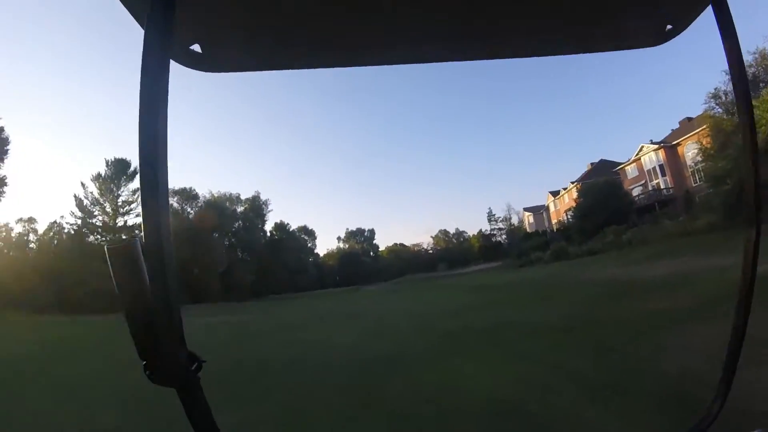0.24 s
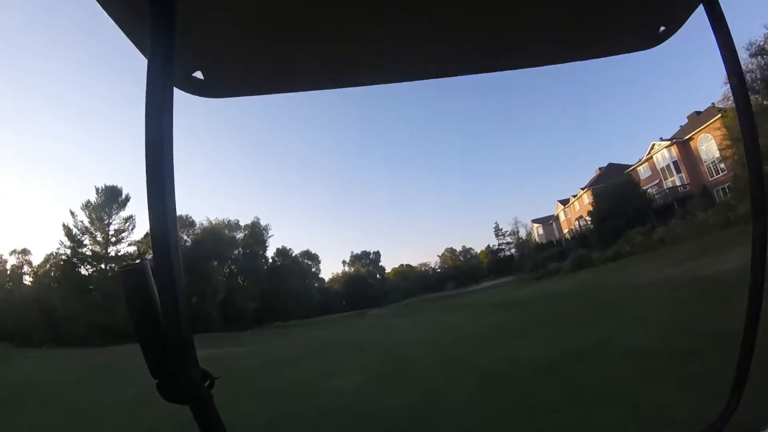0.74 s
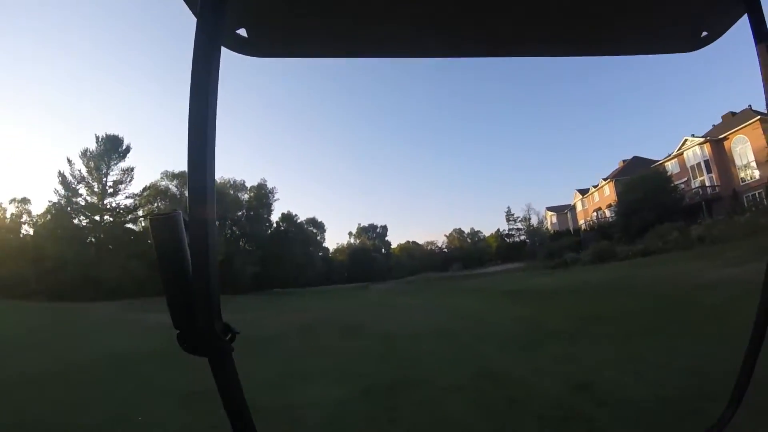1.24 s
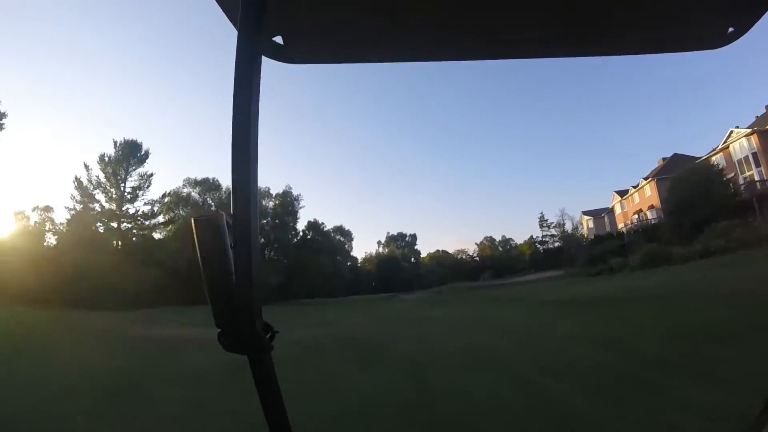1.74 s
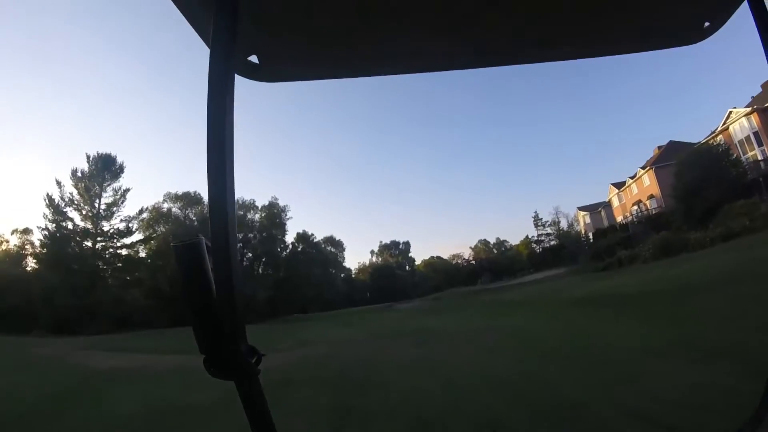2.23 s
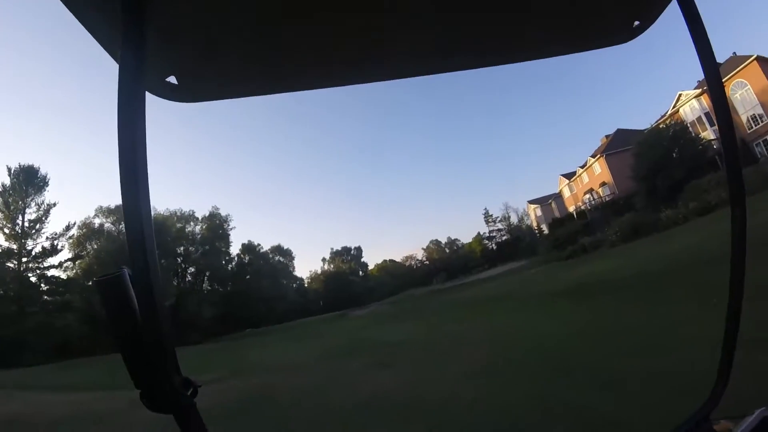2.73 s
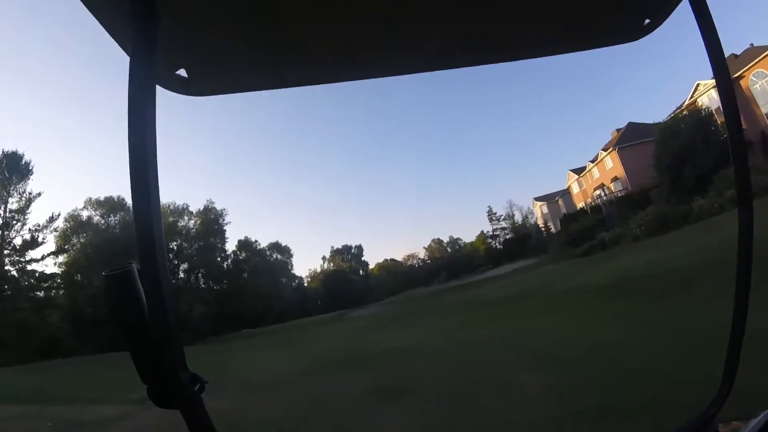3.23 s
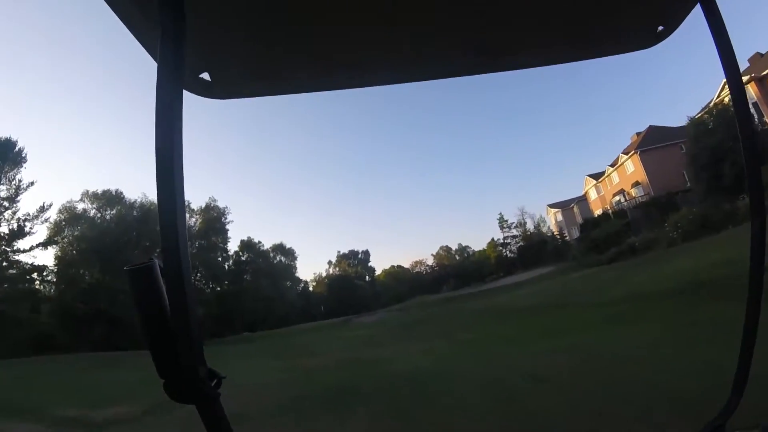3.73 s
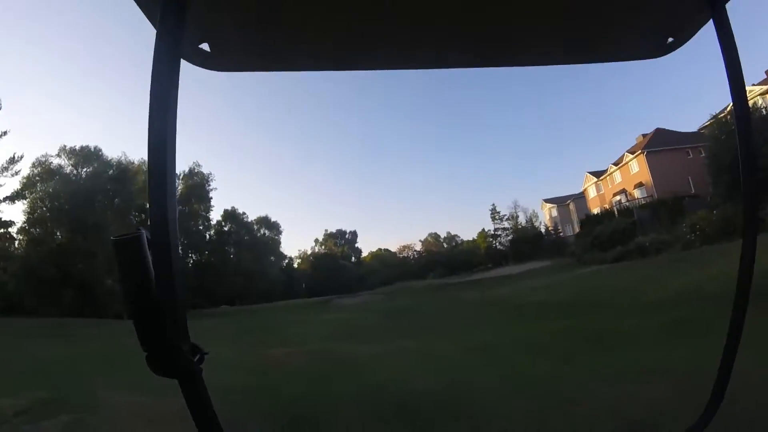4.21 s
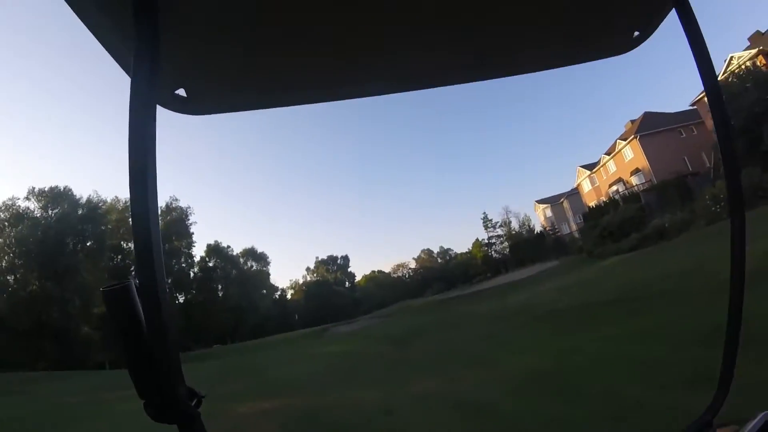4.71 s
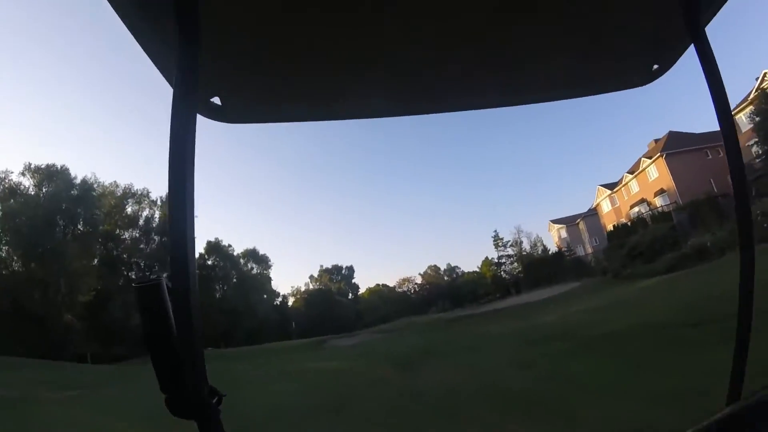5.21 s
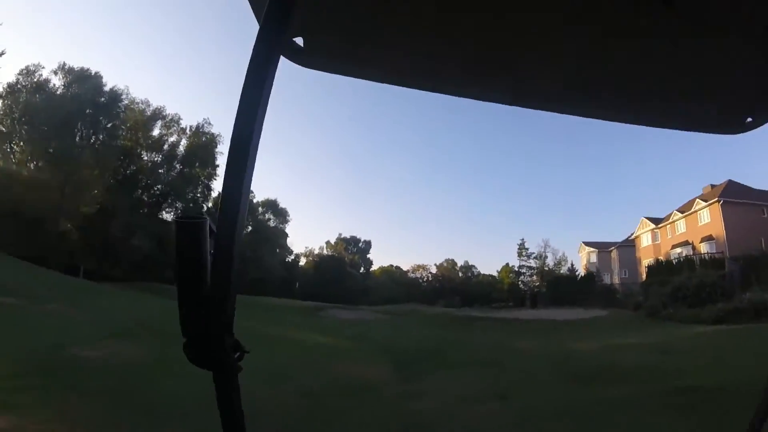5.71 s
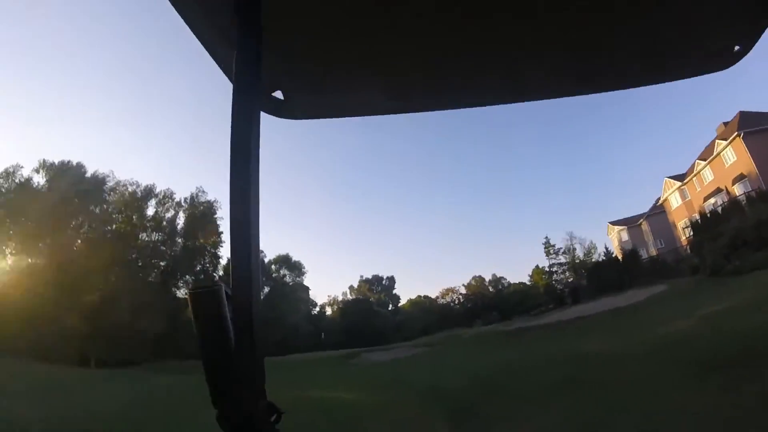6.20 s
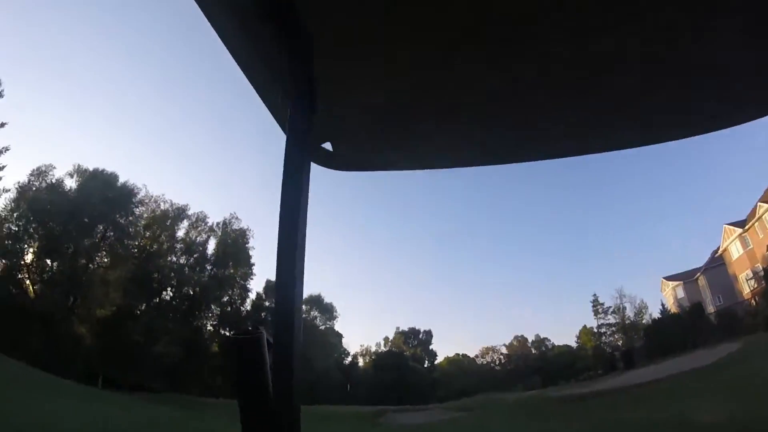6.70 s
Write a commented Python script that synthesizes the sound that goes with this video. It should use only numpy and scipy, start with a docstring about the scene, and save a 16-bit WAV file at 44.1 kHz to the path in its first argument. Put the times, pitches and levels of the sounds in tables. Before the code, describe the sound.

A small cart's one-cylinder engine drones steadily over grass with buzzing panels, while clunky knocks on the microphone mount come in clusters, hardest near the end.

```python
"""A small cart with a one-cylinder four-stroke engine drives over grass at governed speed.
Throughout, engine orders drone, firings buzz in the panels, axle gears whine and the ground rumbles.
Knocks on the microphone's mount crowd the first second, return before 3 s and again near 5.8 s;
the hardest, with dry cracks, comes at 6.2 s, and soft jolts follow from 6.5 s.
The recorder looks ahead, ducks before each loud knock and recovers slowly."""
import sys
import numpy as np
from scipy import signal
from scipy.io import wavfile
from scipy.ndimage import uniform_filter1d, minimum_filter1d

SR = 44100
rng = np.random.default_rng(int(sys.argv[2]) if len(sys.argv) > 2 else 0)


def linear_from_db(decibels):
    """Turn decibels (scalar or array-like) into linear amplitude factors; 0 gives 1."""
    return 10 ** (np.asarray(decibels, float) / 20)


def file_out(sig):
    """Save sig as 16-bit WAV at sys.argv[1]."""
    # one column per channel
    cols = np.atleast_2d(sig).T
    # limit, then scale
    lim = np.clip(cols, -1, 1)
    pcm = np.round(lim * 32767).astype(np.int16)
    wavfile.write(sys.argv[1], SR, pcm)


N = 306495   # samples

PIPE_LAG_RAD = 18.38   # the silencer holds the lowest orders back; divided by the order


def rms_one(x):
    """Normalisation: scales a signal to an rms of 1."""
    return x / np.sqrt(np.mean(x ** 2) + 1e-20)


def in_time(rows):
    """Linear interpolation: the columns of a curve, whose first is seconds, at every sample."""
    s, *columns = np.transpose(rows)
    return [np.interp(np.arange(N) / SR, s, column) for column in columns]


def drift(rate_hz):
    """Low-passed noise: slow random motion of rms 1, from two equal poles at rate_hz."""
    r = np.exp(-80 * np.pi * rate_hz / SR)   # one step every 40 samples
    slow = signal.lfilter([1], [1, -2 * r, r * r], rng.standard_normal(N // 40 + 2002))
    slow = slow[2000:]   # the filter has settled
    return np.interp(np.arange(N) / 40, np.arange(len(slow)), rms_one(slow))


def resonance(x, hz, width_hz):
    """Driven resonance: a two-pole band-pass with a gain of about 1 at its peak."""
    r = np.exp(-np.pi * width_hz / SR)
    zeros = np.array([1, 0, -1]) * (1 - r * r) / 2
    poles = [1, -2 * r * np.cos(2 * np.pi * hz / SR), r * r]
    return signal.lfilter(zeros, poles, x)


def ring(push, hz, t60):
    """Impulse response of a damped mode: a push of area 1 starts a decaying sine of height 1."""
    r = linear_from_db(-60 / (t60 * SR))
    w = 2 * np.pi * hz / SR
    return signal.lfilter([0, np.sin(w)], [1, -2 * r * np.cos(w), r * r], push + 1e-18)


def throb(cycles, depth_db, at):
    """Amplitude modulation: a gain that peaks once a cycle, at the given part of it."""
    return linear_from_db(depth_db * np.cos(2 * np.pi * (cycles - at)))


def thin_tone(cycles, db):
    """Narrow-band tone: a sine that wavers in level and a little in phase."""
    level = np.sqrt(2) * linear_from_db(db + 1.5 * drift(1.5))
    return level * np.sin(2 * np.pi * cycles + .5 * drift(4.0))


def pushes(s, db, ms, area=False):
    """Contact force: short smooth pushes that lean early, scaled by their height or by their area."""
    out = np.zeros(N)
    for start, level_db, length_ms in np.broadcast(s, db, ms):
        u = np.arange(0, 1, 1000 / (max(length_ms, .5) * SR))
        push = -linear_from_db(level_db) * np.sin(np.pi * u) ** 2 * (1.3 - u)
        first = round(start * SR)
        out[first:first + len(u)] += push * (2 / len(u) if area else 1)
    return out


# Engine orders of the drone. Each row: multiple of the firing rate, relative level in dB.
DRONE_ORDERS = [(1, -30), (3, -12), (4, -17), (5, -13), (6, -20.5), (7, -12), (8, -10.5), (9, -19),
                (10, -17), (11, -26), (12, -26), (13, -28)]
OPPOSED_ORDER = 4   # this order swings the other way


def drone(cycles, waver_db, slip_rad):
    """Harmonic series: low engine orders as sines whose level and phase waver a little."""
    out = 0
    for order, db in DRONE_ORDERS:
        sign = -1 if order == OPPOSED_ORDER else 1
        level = sign * linear_from_db(db + waver_db * drift(8.6))
        phase = 2 * np.pi * order * cycles - PIPE_LAG_RAD / order + slip_rad * drift(6.7)
        out = out + level * np.cos(phase)
    return rms_one(out)


# Body panels and exhaust rung by each firing.
# Each row: resonance in Hz, width in Hz, relative level in dB.
PANELS = [(386.4, 9.9, 4.5), (519.5, 20, 2), (631.7, 15, 0.5), (805, 27, 0.5), (861, 35, 4), (990, 33, -25),
          (1440, 4.9, -2.5), (1732, 6.7, 0), (2124, 25, -5.5), (2310, 52, -12.5), (2467, 26, -6.5),
          (2530, 28, -6), (2990, 18, -5), (1283, 11, -3.5), (1686, 6.6, -12), (4000, 150, -17.5)]


def firings(cycles, spread_db, blow_db):
    """Source and resonator: an uneven pulse per firing plus throbbing exhaust noise rings the panels."""
    fired = np.diff(np.floor(cycles), prepend=0) > 0
    pulses = rms_one(fired * linear_from_db(spread_db * rng.standard_normal(N)))
    puff = linear_from_db(blow_db) * throb(cycles, 3.0, 0.0) * rng.standard_normal(N)
    out = 0
    for k, (hz, width_hz, db) in enumerate(PANELS):
        level = (-1) ** k * linear_from_db(db + 1.4 * drift(3.2))   # neighbours in opposite sign
        out = out + level * resonance(pulses + puff, hz, width_hz)
    return rms_one(out)


# Spectrum of fan, belt and tyres. Each row: frequency in Hz, relative density in dB per Hz.
RUSH = [(50, -10.5), (90, -13), (135, -18.5), (190, -22), (250, -21), (320, -27.5), (420, -23.5),
        (800, -24.5), (1000, -27.5), (2000, -33.5), (2700, -36), (3200, -39), (3700, -44), (4200, -44),
        (5100, -48), (6000, -56), (7300, -52), (8200, -56), (10200, -70), (12800, -66), (16000, -72)]


def rush(cycles, patchy_db):
    """Band-shaped noise: third-octave bands flicker partly together and throb faintly with the engine."""
    out, together = 0, drift(8.0)
    edges_hz = 45 * 2 ** (np.arange(26) / 3)
    white = rng.standard_normal((2, N))   # neighbouring bands take different noise
    f, density_db = np.transpose(RUSH)
    for k, (low, high) in enumerate(zip(edges_hz, edges_hz[1:])):
        band_pass = signal.butter(2, [low, high], "band", fs=SR, output="sos")
        band = signal.sosfilt(band_pass, white[k % 2])
        db = np.interp(np.log(low * high) / 2, np.log(f), density_db)
        flicker_db = patchy_db * (2.7 * together + 2.7 * drift(39.0))
        out = out + band * linear_from_db(db + flicker_db)
    return rms_one(out * throb(cycles, 0.061, 0.021))


def tappets(cycles):
    """Resonant noise: valve-gear hiss in two high metal resonances, loudest a third of a cycle in."""
    hiss = rng.standard_normal(N) * throb(cycles, 1.5, 0.33) * linear_from_db(0.96 * drift(23.0))
    lower = resonance(resonance(hiss, 6490, 610), 6490, 610)
    upper = resonance(hiss, 11300, 870)
    return rms_one(lower + linear_from_db(-21.0) * upper)


# The piston shakes the frame once a crank turn, twice a firing.
# Each row: time in seconds, level in dB.
SHAKE = [(0, -21), (.8, -24.5), (1.3, -18.5), (2.3, -20), (3.2, -21.5), (4.2, -19.5), (4.9, -21),
         (5.4, -23), (6.1, -23.5), (6.3, -28), (6.95, -31)]


def shake(cycles):
    """Unbalanced reciprocating mass: a slightly wavering sine at twice the firing rate."""
    level_db = in_time(SHAKE)[0] + .7 * drift(6.0)
    phase = 4 * np.pi * cycles - PIPE_LAG_RAD / 2 + .15 * drift(3.0)
    return np.sqrt(2) * linear_from_db(level_db) * np.cos(phase)


# Upper engine orders that stand out as thin tones, as multiples of the firing rate.
WHINE_ORDERS = [16, 19, 20, 35, 36]
# Mean level of each of those orders in dB.
WHINE_DB = [-45.5, -52, -51.5, -54, -45]


def whine(cycles):
    """Phase-locked harmonics: thin tones that follow multiples of the firing rate."""
    return sum(thin_tone(k * cycles, db) for k, db in zip(WHINE_ORDERS, WHINE_DB))


# Axle gears that follow the road speed. Each row: time in seconds, base pitch in Hz, level in dB.
GEARS = [(0, 132, -45.5), (.8, 131, -45.5), (1.15, 128.6, -47), (1.7, 127.6, -46), (2.3, 126.2, -42.5),
         (3.0, 126.6, -45), (4.0, 127.3, -46), (4.6, 128.7, -44), (5.1, 130.9, -43.5), (5.7, 132.2, -44.5),
         (5.9, 129.5, -45), (6.15, 127, -45), (6.95, 125.5, -45)]
# Multiples of the base pitch that sound.
GEAR_ORDERS = [3, 4, 6, 7, 8, 11, 23]
# Relative level of each multiple in dB at mid speed.
GEAR_DB = [-6, -6, -5, 0.0, -6, -9, -18]
# The axle housing favours some multiples at high speed, others at low: dB per Hz of base pitch.
GEAR_TILT_DB = [1.2, 1.2, 2.6, -1.4, .3, .7, 1.6]
GEAR_MID_HZ = 129
GEAR_WOBBLE_HZ = .3   # the wheels gain and lose speed over the turf


def gears():
    """Gear-mesh harmonics: thin tones that glide with the road speed."""
    pitch_hz, level_db = in_time(GEARS)
    turns = np.cumsum(pitch_hz + GEAR_WOBBLE_HZ * drift(4.0)) / SR
    out = 0
    for k, db, tilt_db in zip(GEAR_ORDERS, GEAR_DB, GEAR_TILT_DB):
        out = out + thin_tone(k * turns, level_db + db + tilt_db * (pitch_hz - GEAR_MID_HZ))
    return out


# Modes of the microphone's bracket. Each row: frequency in Hz, relative level in dB, t60 in seconds.
MOUNT = [(97.2, -0.5, 0.059), (172, -9.5, 0.028), (255.7, -12.5, 0.069)]


def bracket(push, upper):
    """Modal ringing: the mount springs back; modes above the lowest get a push of their own."""
    rung = sum(linear_from_db(db) * ring(upper if k else push, hz, t60)
               for k, (hz, db, t60) in enumerate(MOUNT))
    return -np.roll(rung, round(0.0011 * SR))   # 1.1 ms later


# Sharp knocks on the mount. Each row: start in seconds, level of the direct push in dB, contact in ms,
# ring of the bracket in dB, its upper modes in dB above that, tick of the case in dB.
KNOCKS = [(0.096, -11.5, 2.4, -35, 11, -30), (0.237, -6, 3.9, -37, 6, -42),
          (0.47, -8.5, 2.3, -27, -5, -25.5), (0.584, -14, 2.7, -18, 2, -30),
          (0.658, -10.5, 2.2, -18, 4, -24), (0.747, -12, 2.2, -17.5, 14.5, -25),
          (0.836, -16, 3.2, -40, 2, -35), (0.908, -6.5, 2.9, -10.5, 7, -30), (2.3657, -4, 2.6, -14, 4, -20),
          (2.4306, -2, 2.4, -3, -9, -14), (2.8124, -29, 1.9, -28, 8, -23), (2.8236, -9, 2.2, -28, 6, -20),
          (2.879, 2, 3.3, -6, 2, -27), (5.473, -37, 2, -18, -4, -18.5), (5.7813, -9, 2.1, -12, 10, -26),
          (5.7915, -14, 5, -7, 2, -38), (5.8015, -7, 8.0, -6, 0, -37), (5.823, -24, 2.7, -15, 17, -44),
          (6.2186, 13, 4.0, 15.5, -5, 1), (6.2281, 10.5, 5.1, -30, -5, -21), (6.3236, 3, 3.4, 5, 10, -4),
          (6.5392, 5, 2.2, 2, 5, -8), (6.677, -13, 1.8, 2, -12, -14.5)]
# Modes of the plastic case. Each row: frequency in Hz, relative level in dB, t60 in seconds.
CASE = [(403, -3, 0.034), (513, -10.5, 0.021), (640, -1, 0.012), (810, -9, 0.02), (1060, -4, 0.022),
        (1243, -11.5, 0.016), (1600, -14, 0.0091), (1990, -13, 0.012), (3060, -18, 0.01),
        (4820, -12.5, 0.0035), (6760, -23, 0.006), (10900, -31.5, .004)]
DULLING = 2.6   # dB per octave above 1400 Hz lost for each dB that a tick is weaker than the hardest


def knocks():
    """Impact excitation: a knock pushes directly and rings the bracket; its first touch ticks in the case."""
    s, direct_db, ms, ring_db, upper_db, tick_db = np.transpose(KNOCKS)
    lowest = pushes(s, ring_db, ms, area=True)
    upper = pushes(s, ring_db + upper_db, ms, area=True)
    out = pushes(s, direct_db, ms) + bracket(lowest, upper)
    for hz, db, t60 in CASE:
        touch = np.zeros(N)
        dulled_db = DULLING * (tick_db - tick_db.max()) * max(np.log2(hz / 1400), 0)
        touch[np.round(s * SR).astype(int)] = -linear_from_db(tick_db + db + dulled_db)
        soft = signal.butter(2, 1.4 * hz, fs=SR, output="sos")   # a contact is never a perfect click
        out += signal.sosfilt(soft, ring(touch, hz, t60))
    return out


# Dry cracks of the case under the hardest knock.
# Each row: start in seconds, noise level in dB before the band-pass, t60 in seconds.
CRACKS = [(6.2186, -16, .018), (6.2258, -8, .0015)]


def cracks():
    """Exponential decay: broad noise bursts that die within hundredths of a second."""
    out, length = np.zeros(N), SR // 20
    for s, db, t60 in CRACKS:
        decay_db = db - 60 * np.arange(length) / (t60 * SR)
        out[round(s * SR):][:length] += linear_from_db(decay_db) * rng.standard_normal(length)
    band_pass = signal.butter(1, [1200, 5500], "band", fs=SR, output="sos")
    return signal.sosfilt(band_pass, out)


# Soft jolts that shake the bracket without a tick.
# Each row: start in seconds, level of the direct push in dB, contact in ms.
JOLTS = [(6.512, -15, 4.5), (6.574, -15, 4.3), (6.597, -12.5, 3.1), (6.625, -13, 5.6), (6.659, -4, 11),
         (6.724, 6, 14.4), (6.742, -8, 5.9), (6.7595, -9, 3.7), (6.704, -6, 12), (6.779, -10.5, 4.7),
         (6.794, -9.5, 4.3)]
JOLT_RING_DB = 9   # push on the bracket over the direct push


def jolts():
    """Soft impact: pushes heard directly and through the ringing bracket."""
    s, direct_db, ms = np.transpose(JOLTS)
    push = pushes(s, direct_db + JOLT_RING_DB, ms, area=True)
    return pushes(s, direct_db, ms) + bracket(push, push)


# Bumps that sway the whole frame. Each row: start in seconds, push on the frame in dB.
BUMPS = [(0.23, -0.5), (0.468, 1), (0.903, 1), (2.809, -13), (2.873, 6), (6.319, 0), (2.4265, -3),
         (6.670, 11), (6.704, 4)]
BUMP_MS, BUMP_DIRECT_DB = 17.3, -11.5   # contact; direct push over the push on the frame
SWAY_HZ, SWAY_T60_S = 33.3, 0.12


def bumps():
    """Mass on a spring: a slow push and the low damped sway of the frame it sets off."""
    s, db = np.transpose(BUMPS)
    direct = pushes(s, db + BUMP_DIRECT_DB, BUMP_MS)
    return direct - ring(pushes(s, db, BUMP_MS, area=True), SWAY_HZ, SWAY_T60_S)


# Wheels over uneven turf. Each row: time in seconds, rumble level in dB.
GROUND = [(0.0, -27.5), (0.54, -28), (0.92, -16.5), (1.39, -25.5), (1.53, -14.5), (1.92, -43), (2.29, -23),
          (2.48, -13.5), (2.68, -36), (2.94, -15.5), (3.09, -21.5), (3.65, -20), (3.94, -27.5), (4.47, -17),
          (4.67, -25.5), (4.91, -14.5), (5.1, -27.5), (5.8, -26), (6.1, -26.5), (6.5, -24), (6.95, -27.5)]


def ground():
    """Structure-borne noise: very low rumble up the suspension, whose springs even out its swing."""
    band_pass = signal.butter(3, [13, 36], "band", fs=SR, output="sos")
    low = signal.sosfilt(band_pass, rng.standard_normal(N + SR))
    swing = np.sqrt(uniform_filter1d(low ** 2, size=SR // 12))
    return linear_from_db(in_time(GROUND)[0]) * rms_one((low / swing)[SR:])


# Governed engine. Each row: time in seconds, firings per second in Hz, load in dB.
ENGINE = [(0, 23.05, -.8), (.4, 23.05, -.8), (.7, 23.3, -.6), (.95, 23.15, -1.5), (1.9, 23.28, -.8),
          (2.3, 23.3, .6), (2.6, 23.45, -.6), (3.2, 23.42, -1.5), (3.9, 23.62, -1.2), (4.6, 23.78, -.4),
          (4.85, 23.62, 0.0), (5.15, 23.78, 0.0), (5.75, 23.8, .3), (6.0, 23.45, -.4), (6.5, 23.55, 0.0),
          (6.95, 23.6, -1.0)]
DRONE_DB, FIRING_DB, RUSH_DB, TAPPET_DB = -26.5, -38, -29.5, -55   # rms before the load
PANEL_LEAD = .37   # panels ring ahead of the drone (cycles)


def scene():
    """Superposition: engine, gears, knocks and ground add at one microphone."""
    rate_hz, load_db = in_time(ENGINE)
    cycles = np.cumsum(rate_hz) / SR
    engine = linear_from_db(DRONE_DB) * drone(cycles, waver_db=1.6, slip_rad=.35)
    engine += linear_from_db(FIRING_DB) * firings(cycles + PANEL_LEAD, spread_db=2.0, blow_db=2.0)
    engine += linear_from_db(RUSH_DB) * rush(cycles, patchy_db=0.19)
    engine += linear_from_db(TAPPET_DB) * tappets(cycles)
    tones = shake(cycles) + whine(cycles) + gears()
    impacts = knocks() + cracks() + jolts() + bumps()
    return (linear_from_db(load_db) * engine + tones + impacts + ground())[None]


def band_limit(x):
    """A steep low-pass at the top of the band."""
    return signal.sosfilt(signal.butter(12, 13975, fs=SR, output="sos"), x)


CEILING_DB, SHARE_CUT = -9.2, .76   # level where the gain control acts; share of the excess it removes
LOOK_AHEAD_S, RECOVERY_S = .055, 1.2   # the recovery is a time constant


def record(dry):
    """Look-ahead gain control, deaf to the lowest bass, behind a housing that muffles the treble:
    the cut that a peak needs starts early, at once, and dies away exponentially."""
    dull = signal.sosfiltfilt(signal.butter(7, 4400, fs=SR, output="sos"), dry)
    heard = dull + linear_from_db(-6.5) * (dry - dull)
    sensed = signal.sosfilt(signal.butter(2, 70, "high", fs=SR, output="sos"), heard[0])
    level = uniform_filter1d(np.abs(sensed), size=40)   # peaks are read over 1 ms
    over_db = np.maximum(20 * np.log10(level + 1e-9) - CEILING_DB, 1e-3)
    ahead = round(LOOK_AHEAD_S * SR)
    coming_db = -minimum_filter1d(-over_db, size=ahead + 1, origin=-(ahead // 2))
    full_db = -minimum_filter1d(-coming_db, size=401, origin=-200)   # the top of that peak, 9 ms further on
    coming_db = np.where(coming_db > 1e-3, full_db, coming_db)
    fade = np.arange(N) / (RECOVERY_S * SR)
    excess_db = np.exp(np.maximum.accumulate(np.log(coming_db) + fade) - fade)
    excess_db = uniform_filter1d(excess_db, size=3)   # the step is all but instant
    return band_limit(heard * linear_from_db(-SHARE_CUT * excess_db))


dry = scene()
out = record(dry)
file_out(out)
```